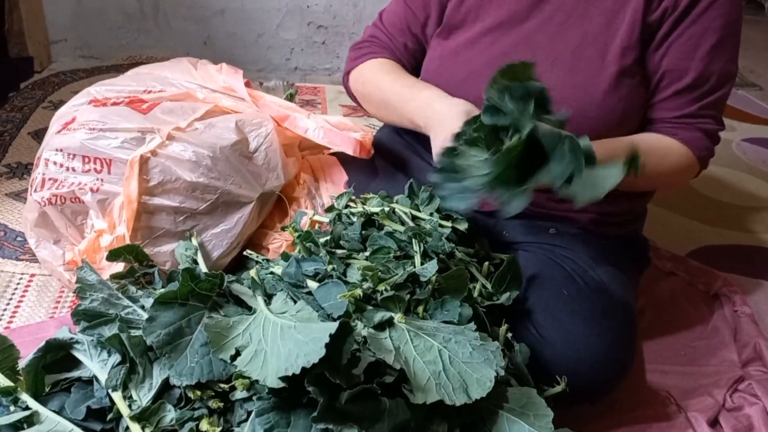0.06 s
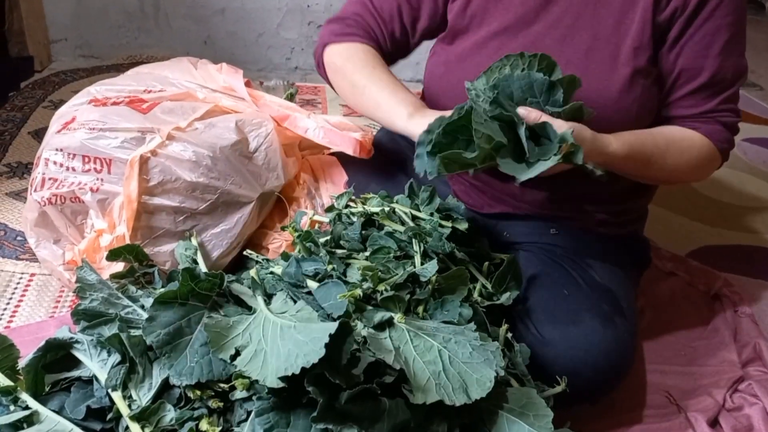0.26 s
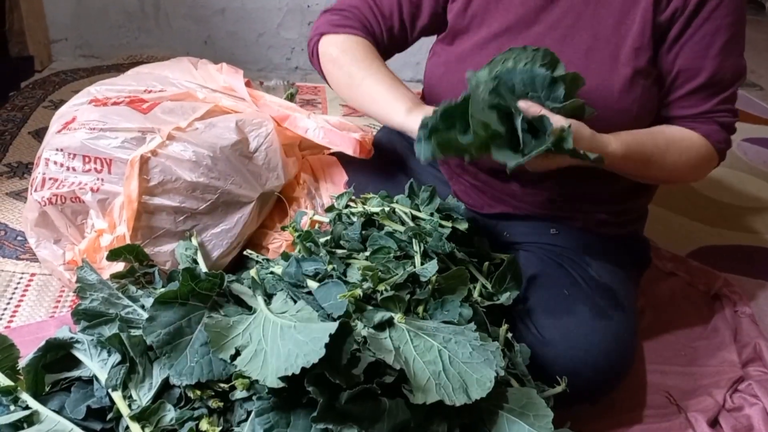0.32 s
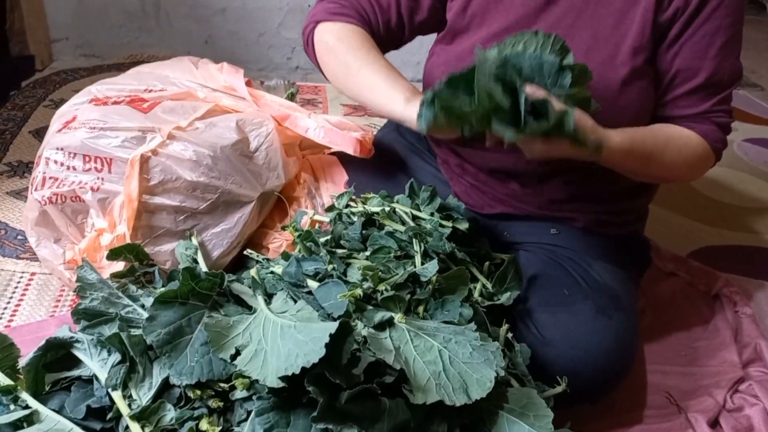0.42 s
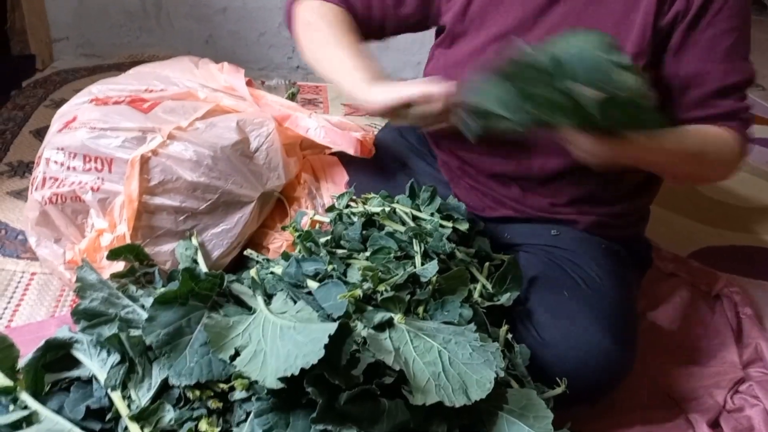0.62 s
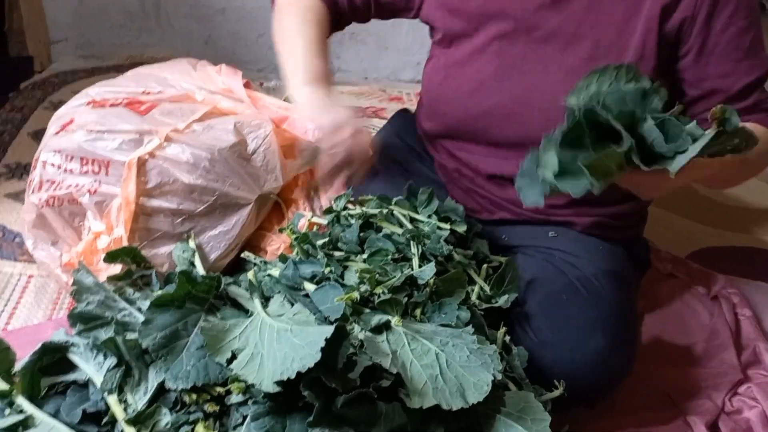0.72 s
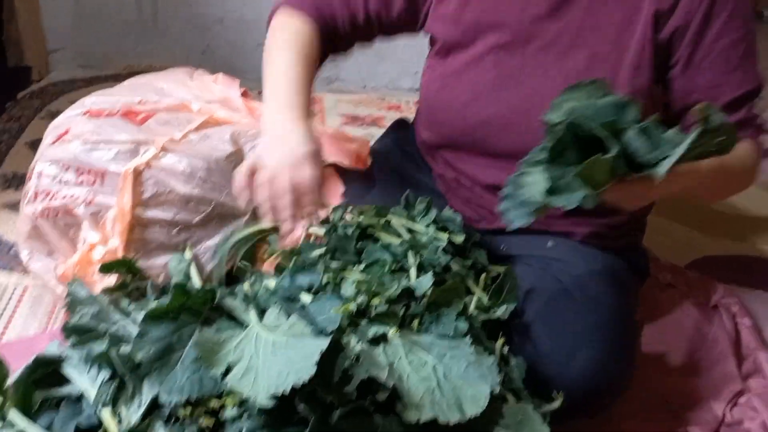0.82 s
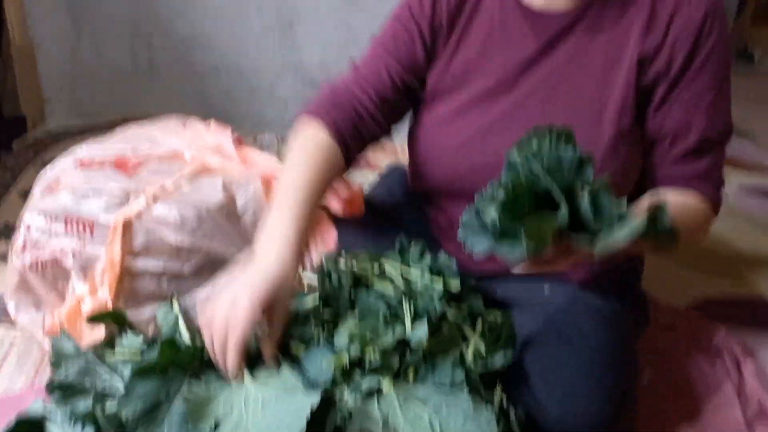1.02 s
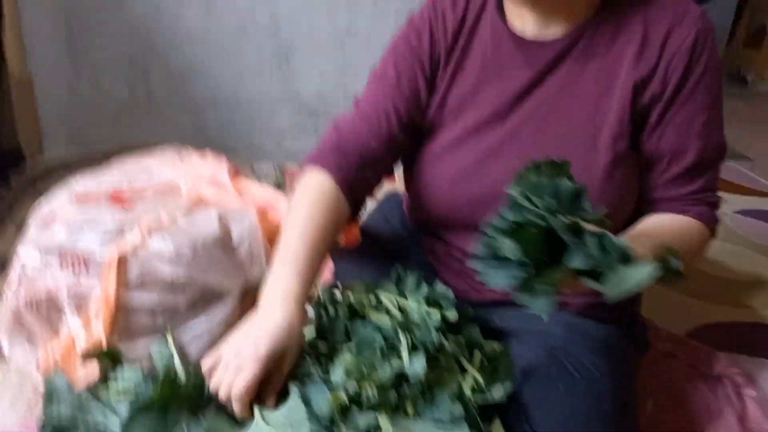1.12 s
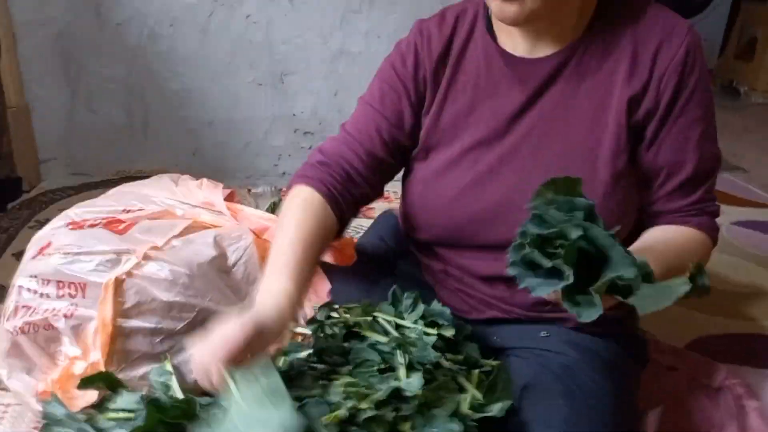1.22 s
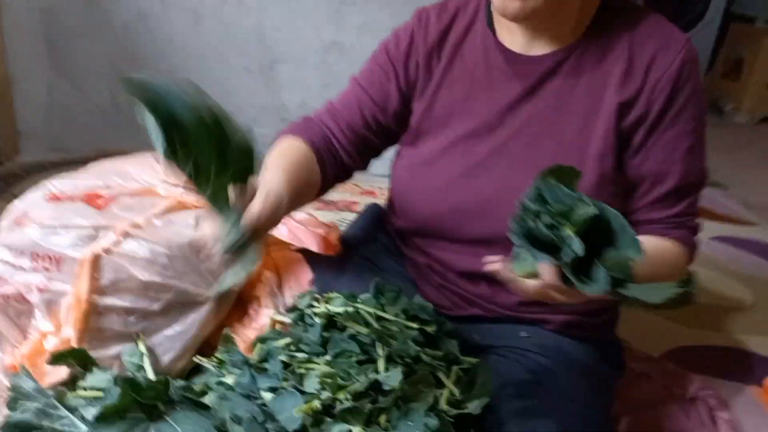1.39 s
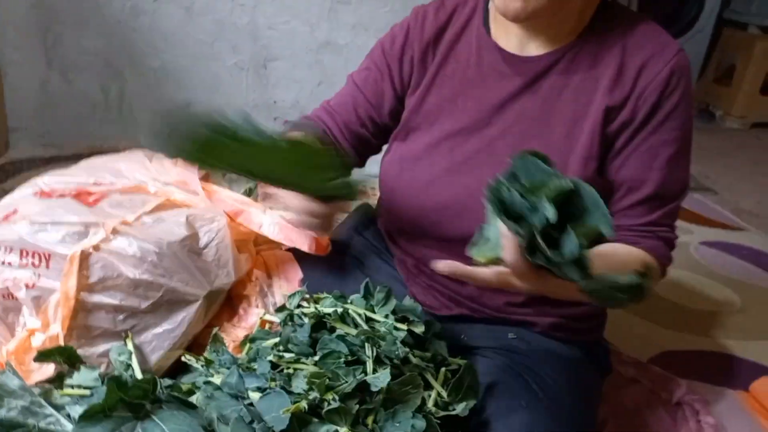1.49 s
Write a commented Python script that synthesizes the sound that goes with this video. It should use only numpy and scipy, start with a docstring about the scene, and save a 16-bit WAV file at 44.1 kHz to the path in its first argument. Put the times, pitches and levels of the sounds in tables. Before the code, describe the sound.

Leafy greens rustle close by as hands work a bunch in a small, quiet room. A stalk breaks with a loud, crisp double snap at about 0.25 seconds, and another snaps at 0.6. From there a hand brushes past a plastic sack and loose leaves with small crinkles. It bumps softly into the heap around 1.0 to 1.2 seconds, and the rustle thins out by 1.4.

```python
"""A close, leafy rustle broken by crisp snaps: greens are sorted by hand in a small bare room.
Leaves rub in the held bunch by stick-slip friction and tick as they buckle; stalks fracture and ring.
Then a hand brushes past a plastic sack, bumps softly into the heap on the floor and draws out a leaf.
All is heard in stereo, with the room's short reverberation and its faint low noise."""
import sys
import numpy as np
from scipy import signal
from scipy.fft import rfft, irfft, next_fast_len
from scipy.io import wavfile

SR = 44100
rng = np.random.default_rng(int(sys.argv[2]) if len(sys.argv) > 2 else 0)


def unload_audio(sound):
    """Save the sound as a 16-bit wav file, at the path given as the first command line argument."""
    columns = np.transpose(np.atleast_2d(sound))
    # keep every value between -1 and 1, then stretch to whole-number steps
    steps = np.round(np.clip(columns, -1, 1) * 32767)
    wavfile.write(sys.argv[1], SR, steps.astype(np.int16))


N = 68355


def amp(db):
    """Amplitude ratio of a level in decibels."""
    return 10 ** (np.asarray(db) / 20)


def unit(x):
    """Normalisation to an rms of 1."""
    return x / np.sqrt(np.mean(x ** 2) + 1e-20)


def along(points, hz):
    """Interpolation of (frequency_hz, value) points on a logarithmic frequency axis."""
    knots_hz, values = np.transpose(points)
    return np.interp(np.log(hz + 1), np.log(knots_hz + 1), values)


def envelope(points):
    """Amplitude envelope through (time_s, level_db) points."""
    return amp(np.interp(np.arange(N) / SR, *np.transpose(points)))


def filtered(x, response):
    """Linear filtering: the spectrum is multiplied by a frequency response."""
    size = x.shape[-1]
    padded = next_fast_len(size + 8192)
    return irfft(rfft(x, padded) * response(np.fft.rfftfreq(padded, 1 / SR)), padded)[..., :size]


def coloured(x, tone):
    """Minimum-phase filtering at unit energy, shaped by (frequency_hz, gain_db) points."""
    cepstrum = irfft(np.log(amp(along(tone, np.fft.rfftfreq(4096, 1 / SR)))))
    half = len(cepstrum) // 2
    causal = np.r_[cepstrum[0], 2 * cepstrum[1:half], np.zeros(half)]
    kernel = irfft(np.exp(rfft(causal)))
    return signal.fftconvolve(x, kernel / np.linalg.norm(kernel))[:len(x)]


def add(track, start_s, sound):
    """Superposition of a sound on a track."""
    part = track[..., max(0, round(start_s * SR)):][..., :sound.shape[-1]]
    part += sound[..., :part.shape[-1]]


def diffuse(pair):
    """Diffuse field: two independent noises are mixed so that long waves are alike on both sides."""
    # left-right likeness: frequency_hz, coherence
    likeness = [(100, 0.69), (400, 0.65), (1200, 0), (3000, 0.1), (12000, 0)]

    def mid_side_gains(hz):
        angle = np.arccos(np.clip(along(likeness, hz), -1, 1)) / 2
        return np.array([np.cos(angle), np.sin(angle)])

    mid, side = filtered(pair, mid_side_gains)
    return np.array([mid + side, mid - side])


def in_room(x, wet_db, lag_ms, pan_db):
    """Reverberation follows the direct sound; lag_ms and pan_db are left relative to right."""
    # reverberation time: frequency_hz, t60_s
    decay = [(150, 0.15), (800, 0.38), (2000, 0.22), (6000, 0.2), (15000, 0.22)]
    early_db, early_t60_s, gap_s = 0.5, 0.028, 0.0021
    bands_hz, t, noise = signal.stft(rng.standard_normal((2, SR // 3)), SR, nperseg=256)
    late = amp(-60 * t / along(decay, bands_hz)[:, None])
    early = amp(early_db - 60 * t / early_t60_s)
    tail = signal.istft(noise * (late + early), SR, nperseg=256)[1]
    onset = np.clip(np.arange(tail.shape[1]) / SR / gap_s - .5, 0, 1)
    tail = diffuse(tail) * onset
    wet = signal.fftconvolve(x[None], tail / np.linalg.norm(tail[0]), axes=1)[:, :len(x)]
    sides = np.array([[.5], [-.5]])
    direct = filtered(x, lambda hz: np.exp(-2j * np.pi * hz * sides * lag_ms / 1000))
    return amp(sides * pan_db) * (direct + amp(wet_db) * wet) / np.hypot(1, amp(wet_db))


def room_tone(level_db=-72.5):
    """Ambient noise: the still room holds a faint, low diffuse field."""
    # noise spectrum: frequency_hz, gain_db
    tone = [(25, -71), (48, -27), (65, -4.5), (85, -1), (120, -3), (220, -4), (450, -11), (900, -22.5),
            (3000, -31), (8000, -16.5), (16000, -38)]
    noise = diffuse(rng.standard_normal((2, N)))
    return amp(level_db) * unit(filtered(noise, lambda hz: amp(along(tone, hz))))


def friction(per_s, spread_db, hiss):
    """Stick-slip friction: random impulses of uneven size over a smooth sliding noise, at rms 1."""
    sizes = rng.choice([-1, 1], N) * amp(spread_db * np.minimum(rng.exponential(size=N), 4))
    slips = sizes * (rng.random(N) < per_s / SR)
    return unit(unit(slips) + hiss * rng.standard_normal(N))


def rubbing(effort, tone, per_s, wet_db, lag_ms, pan_db, count=3):
    """Incoherent sources add in power: several leaves slip at once, each with its own reflections."""
    leaves = [coloured(friction(per_s, spread_db=2.5, hiss=.8) * envelope(effort), tone)
              for _ in range(count)]
    return sum(in_room(leaf, wet_db, lag_ms, pan_db) for leaf in leaves) / np.sqrt(count)


def heap_bumps():
    """Damped impacts: the heap yields with a dull shuffle and knocks; lower ones rise and fade slower."""
    # weight of the hand on the heap: time_s, level_db
    press = [(.93, -73), (.98, -61), (1.02, -52), (1.09, -56), (1.14, -49.5), (1.19, -73), (1.26, -71),
             (1.32, -71.5), (1.37, -100)]
    # spectrum of the shuffle: frequency_hz, gain_db
    tone = [(30, -51), (55, -41), (85, 1.5), (160, 3), (350, 2), (520, 4.5), (700, -8), (1200, -8),
            (3000, -54)]
    # knocks of hand, leaves and knees: start_s, relative_level_db, pitch_hz
    knocks = [(.005, -55, 475), (.377, -51.5, 340), (0.409, -55.5, 397), (.609, -57, 328),
              (.996, -42.5, 450), (1.005, -55, 266), (1.031, -42, 345), (1.042, -56, 88),
              (1.056, -41.5, 394), (1.066, -50, 322), (1.121, -46, 211), (1.13, -43.5, 377),
              (1.135, -58, 85.4), (1.25, -58, 104), (1.296, -58.5, 92), (1.473, -61.5, 96)]
    t60_cycles, rise_cycles = 9.3, 0.74
    t = np.arange(SR // 5) / SR
    out = coloured(friction(per_s=480, spread_db=1, hiss=0.52) * envelope(press), tone)
    for start_s, level_db, pitch_hz in knocks:
        cycles = t * pitch_hz
        swell = amp(level_db - 60 * cycles / t60_cycles) * (1 - np.exp(-cycles / rise_cycles))
        add(out, start_s, 2 * swell * np.sin(2 * np.pi * cycles))
    low_cut = signal.butter(3, 65, "high", fs=SR, output="sos")
    return in_room(signal.sosfilt(low_cut, out), wet_db=-7, lag_ms=0.3, pan_db=-3.5)


def heap_brushing():
    """Sliding friction: the hand brushes the sack and the loose leaves."""
    # strength of the brushing: time_s, level_db
    effort = [(.58, -74), (.64, -48), (.685, -62.5), (.745, -52), (.78, -56), (.88, -54), (.92, -52),
              (.96, -55.5), (.995, -55), (1.09, -59.5), (1.16, -50), (1.21, -58), (1.28, -60),
              (1.315, -54.5), (1.37, -69.5), (1.44, -69.5), (1.51, -71.5), (1.55, -61)]
    # friction spectrum: frequency_hz, gain_db
    tone = [(150, -19.5), (450, -10), (850, -6), (1350, 1), (2800, 3), (4500, 1), (6500, -2), (8000, -2.5),
            (10000, -7.5), (13000, -4), (16000, -12.5)]
    return rubbing(effort, tone, per_s=600, wet_db=2, lag_ms=0.097, pan_db=-0.9)


def bunch_rustle():
    """Stick-slip friction: waxy leaves slide over each other between the hands."""
    # strength of the rubbing: time_s, level_db
    effort = [(0, -50.5), (.022, -59), (.042, -59.5), (.08, -54), (.13, -53), (.155, -45.5), (.185, -53.5),
              (.225, -52), (.31, -50.5), (.36, -57), (.385, -64.5), (.42, -55), (.44, -79.5), (.455, -49.5),
              (.485, -58), (.505, -59), (.55, -52.5), (.585, -99), (.65, -80), (.72, -100)]
    # friction spectrum: frequency_hz, gain_db
    tone = [(150, -18), (500, -14.5), (950, -18), (1250, 0), (1900, 0.5), (2500, 0.5), (4200, 0.5),
            (6000, -1.5), (8000, 0.5), (10000, -1.5), (13500, 0), (16000, -16)]
    return rubbing(effort, tone, per_s=700, wet_db=1.5, lag_ms=0.033, pan_db=0.3)


def leaf_crinkles():
    """Buckling: a leaf gives way with one short burst of band-limited noise."""
    # single crinkles: start_s, relative_level_db, centre_hz
    ticks = [(.006, -43, 2040), (0.075, -43, 3340), (0.3712, -47.5, 1420), (0.4082, -45.5, 6100),
             (0.4536, -65, 4030), (.4805, -47, 4050), (0.5559, -40.5, 4550), (0.6165, -31, 3240),
             (0.707, -50, 2730), (0.73, -38, 6200), (0.8035, -49, 4760), (0.9116, -42.5, 3000),
             (.993, -48, 1500), (1.015, -46, 11400), (1.2495, -44, 6260), (1.533, -52, 4260)]
    t60_s, band_ratio = 0.0067, 2 ** 1.33
    out, t = np.zeros((2, N)), np.arange(SR // 4) / SR
    for start_s, level_db, hz in ticks:
        tone = [(hz / band_ratio ** 2, -26), (hz / band_ratio, -6), (hz, 0), (hz * band_ratio ** 2, -14)]
        tick = coloured(rng.standard_normal(len(t)) * amp(level_db - 60 * t / t60_s), tone)
        add(out, start_s, in_room(tick, wet_db=0.5, lag_ms=0.061, pan_db=-0.5) * amp(3.5))
    return out


def stalk_snaps(fibre_count=6):
    """Brittle fracture: a stalk's modes ring briefly while its fibres part one after another."""
    # breaks, at relative levels: start_s, tear_db, t60_s, then three pairs of mode_hz, mode_db
    breaks = [(0.2285, -11.5, 0.0049, 1635, -19, 2130, -16.5, 10350, -17.5),
              (0.252, -20.5, 0.0018, 1610, -14.5, 2430, -15.5, 4600, -22),
              (0.5177, -32, 0.0082, 1320, -45, 4100, -35.5, 7650, -39.5),
              (0.6058, -22, 0.0075, 1240, -29.5, 2970, -26, 4680, -30)]
    # spectrum of a parting fibre: frequency_hz, gain_db
    fibre_tone = [(25, -20), (100, -30), (220, -7), (500, -16.5), (780, -2), (1020, -21), (1400, -4.5),
                  (3000, 5), (6000, 3.5), (11000, 2.5), (15500, 1.5)]
    fibre_gap_s, fibre_loss_db = .0004, 1.65
    ring_rise_s, ring_low_hz = 0.00013, 1182
    out, t = np.zeros((2, N)), np.arange(SR // 3) / SR
    click = coloured(signal.unit_impulse(len(t)), fibre_tone)
    small_body = signal.butter(7, ring_low_hz, "high", fs=SR, output="sos")  # radiates little bass
    rise = 1 - np.exp(-t / ring_rise_s)
    for start_s, tear_db, t60_s, *modes in breaks:
        for mode_hz, mode_db in zip(modes[::2], modes[1::2]):
            ring = amp(mode_db - 60 * t / t60_s) * rise * np.sin(2 * np.pi * mode_hz * t)
            radiated = signal.sosfilt(small_body, ring)
            add(out, start_s, in_room(radiated, wet_db=1.5, lag_ms=0.029, pan_db=-1.0) * amp(3))
        for k, (jitter, polarity) in enumerate(rng.random((fibre_count, 2))):
            fibre = np.sign(polarity - .5) * amp(tear_db - fibre_loss_db * k) * click
            parting_s = start_s + (k + 1 + jitter) * fibre_gap_s
            add(out, parting_s, in_room(fibre, wet_db=7, lag_ms=0.016, pan_db=0.5) * amp(7))
    return out


def scene():
    """Superposition of all sources at the stereo microphone."""
    return stalk_snaps() + leaf_crinkles() + bunch_rustle() + heap_brushing() + heap_bumps() + room_tone()


def record(dry, cutoff_hz=15600):
    """Band limiting: a steep low-pass removes the highest treble."""
    return filtered(dry, lambda hz: 1 / np.sqrt(1 + (hz / cutoff_hz) ** 160))


dry = scene()
out = record(dry)
unload_audio(out)
```